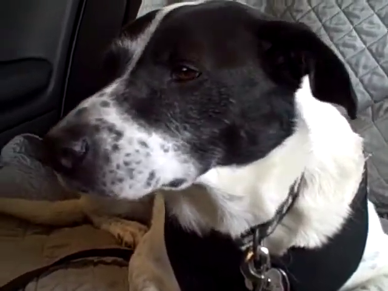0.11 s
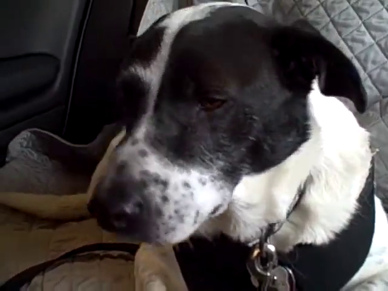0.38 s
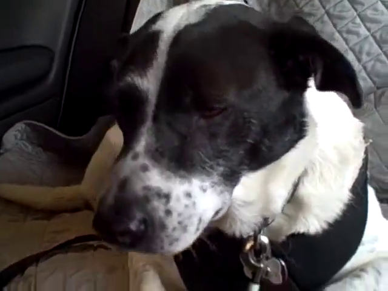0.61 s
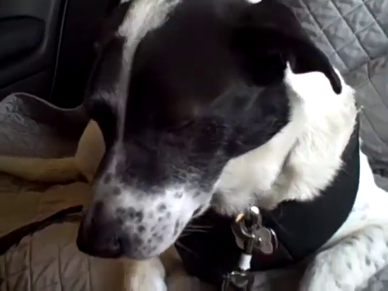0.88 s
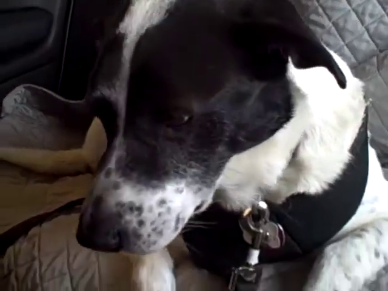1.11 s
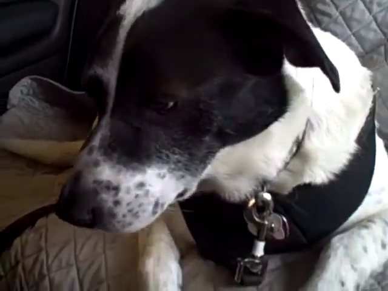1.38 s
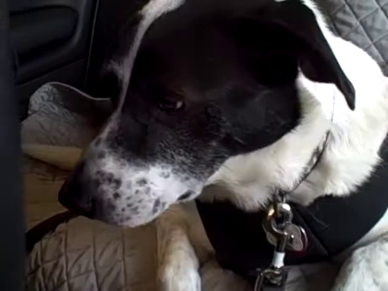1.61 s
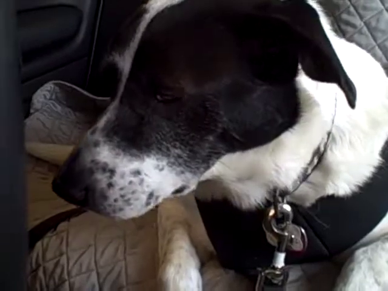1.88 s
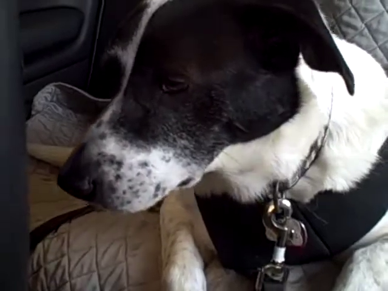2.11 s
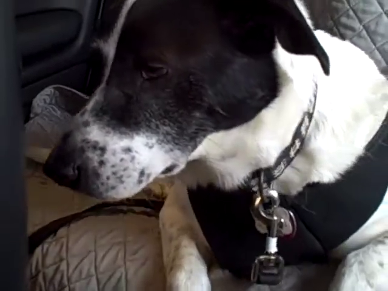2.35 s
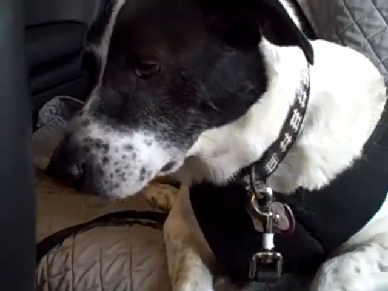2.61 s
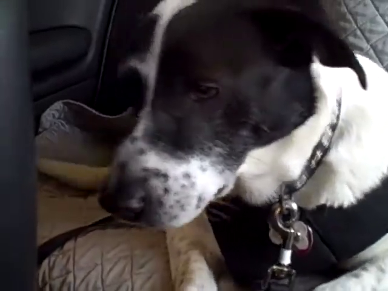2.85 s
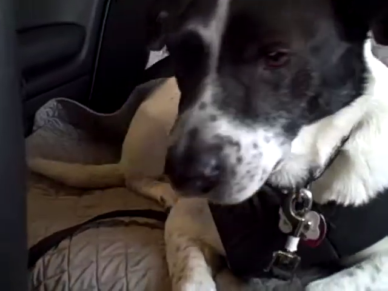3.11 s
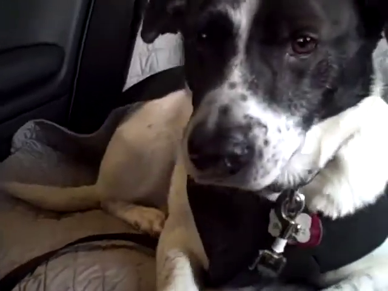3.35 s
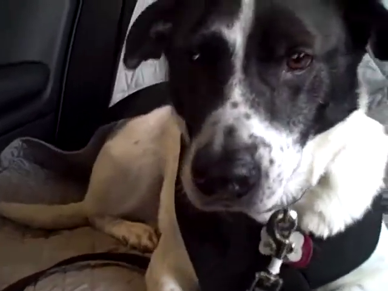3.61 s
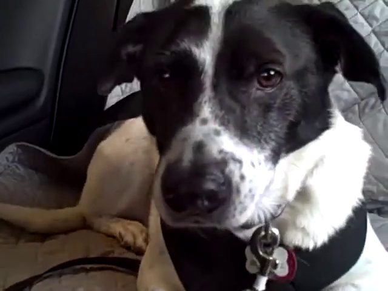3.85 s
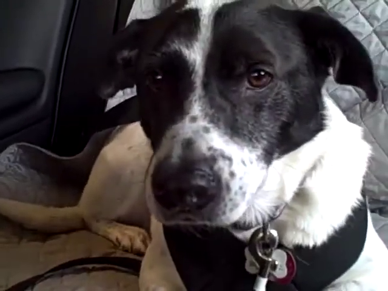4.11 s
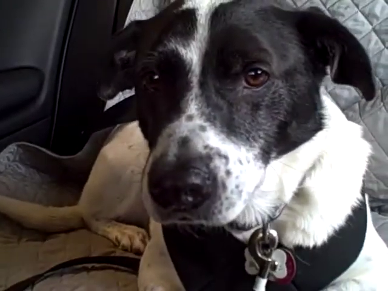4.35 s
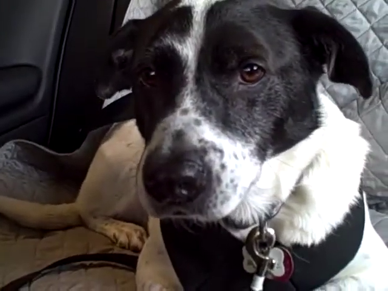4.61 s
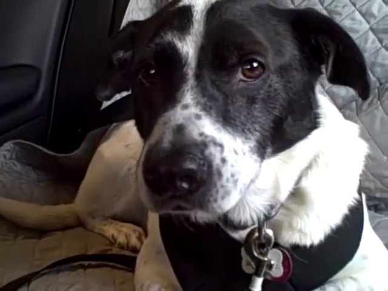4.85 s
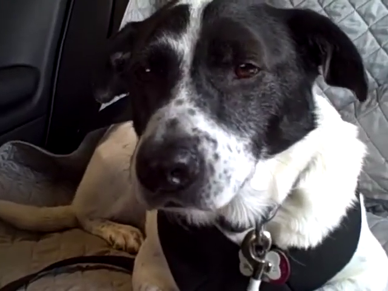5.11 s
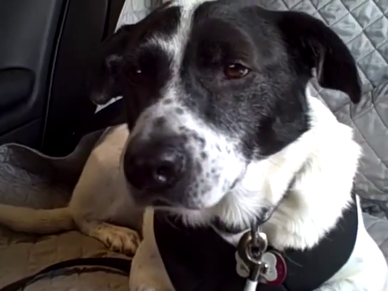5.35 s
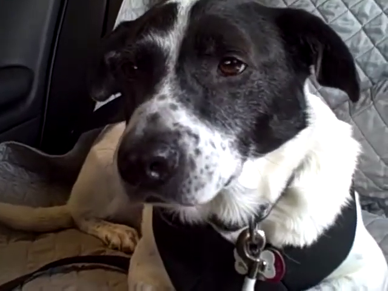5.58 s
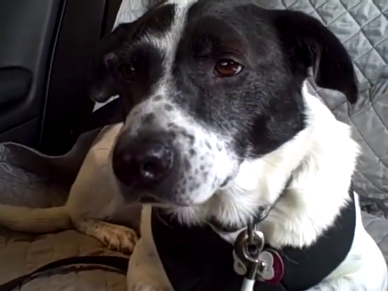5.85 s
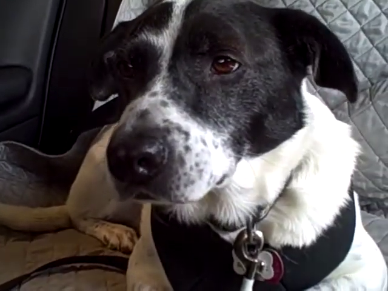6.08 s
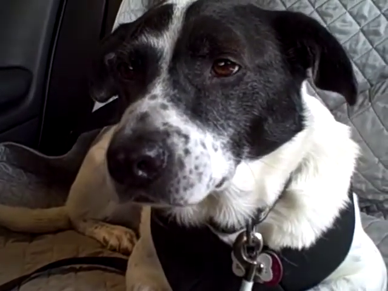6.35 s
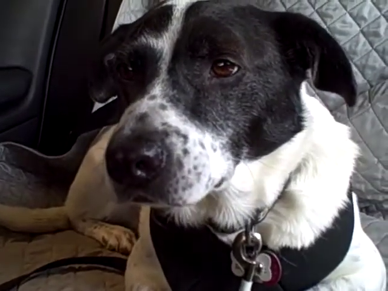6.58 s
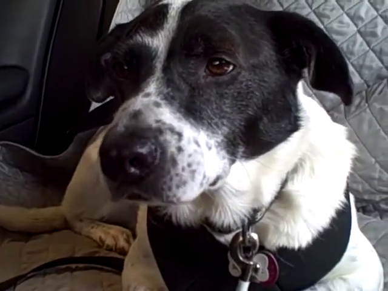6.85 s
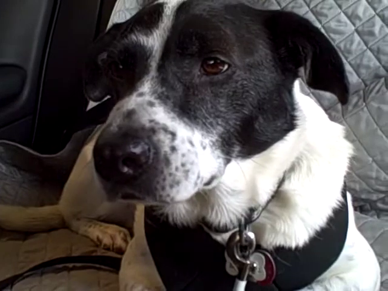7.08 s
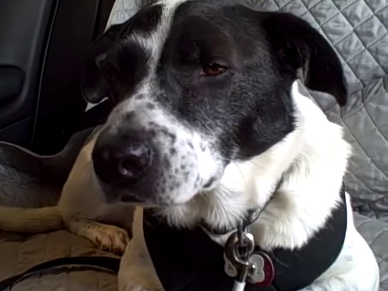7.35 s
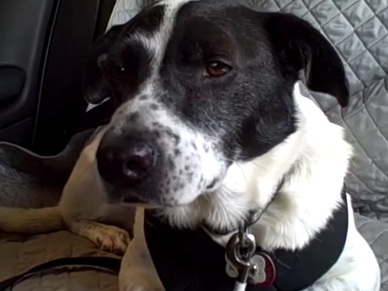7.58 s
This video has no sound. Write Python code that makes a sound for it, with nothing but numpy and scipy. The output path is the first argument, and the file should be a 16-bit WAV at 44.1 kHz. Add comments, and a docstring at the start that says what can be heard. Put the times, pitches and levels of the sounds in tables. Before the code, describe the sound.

Deep, unbroken ferry engine rumble fills a car cabin, pulsing gently underneath, with a wavering mid whine and a thin layer of hiss.

```python
"""A ferry's diesel engines drone steadily inside a car on the vehicle deck, the fourth order of the cycle leading.
The engines are a harmonic comb of wavering sines; two propellers, slightly apart in blade rate, beat below.
Hull and deck are shaped noise, the deck's with narrow resonances; a turbocharger whistles faintly as two sines.
A coarse 8-bit companding converter adds hiss that grows with the swings of the wave."""
import sys
import numpy as np
from scipy import signal
from scipy.fft import rfft, irfft, next_fast_len
from scipy.io import wavfile

SR = 44100
rng = np.random.default_rng(int(sys.argv[2]) if len(sys.argv) > 2 else 0)


def ratio_of_db(decibels):
    """Turn decibels (scalar or array-like) into linear amplitude factors; 0 dB maps to 1."""
    return 10 ** (np.asarray(decibels, float) / 20)


def store_pcm(level_fs):
    """Save levels as 16-bit WAV."""
    pcm = np.round(np.clip(level_fs, -1, 1) * 32767).astype(np.int16)
    wavfile.write(sys.argv[1], SR, np.atleast_2d(pcm).T)


N = 340011  # length in samples


def seconds():
    """Uniform sampling: the time of every sample, in s."""
    return np.arange(N) / SR


def in_time(rows):
    """Linear interpolation: a table of (t/s, value) read at every sample."""
    t, values = np.transpose(rows)
    return np.interp(seconds(), t, values)


def stretch(slow, size):
    """Linear interpolation: a coarse curve read at more points."""
    return np.interp(np.linspace(0, len(slow) - 1, size), np.arange(len(slow)), slow)


def drift(rate_hz, count):
    """Low-passed white noise wanders slowly: rows of unit spread, one point for every 200 samples."""
    settling = 500  # points discarded while the filter fills
    pole = np.exp(-2 * np.pi * rate_hz * 200 / SR)
    white = rng.standard_normal((count, N // 200 + 2 + settling))
    slow = signal.lfilter([1], [1, -2 * pole, pole ** 2], white)[:, settling:]
    return slow / slow.std(axis=1, keepdims=True)


def slow_curve(rate_hz):
    """Low-passed white noise again: a single drift at the full sample rate."""
    return stretch(drift(rate_hz, count=1)[0], N)


def tone(hz, db):
    """Phase is the integral of frequency: a sine following curves of pitch and rms level."""
    turns = np.cumsum(hz * np.ones(N)) / SR + rng.random()
    return np.sqrt(2) * ratio_of_db(db) * np.sin(2 * np.pi * turns)


def coloured_noise(spectrum):
    """Spectral shaping: white noise weighted to a density in dB per Hz, straight over log frequency."""
    size = next_fast_len(N)
    hz = np.maximum(np.fft.rfftfreq(size, 1 / SR), 1)
    table_hz, density_db = np.transpose(spectrum)
    gain = ratio_of_db(np.interp(np.log(hz), np.log(table_hz), density_db))
    white = rng.standard_normal(size)
    return irfft(rfft(white) * gain, size)[:N] * np.sqrt(SR / 2)


def engine():
    """Periodic forcing gives a line spectrum: each order wavers on its own path through the steel."""
    # orders that stand apart from the rule: order (multiple of the cycle), level/dB (rms)
    orders_apart = [(2, -39), (5, -32.5), (6, -34.5), (8, -58), (9, -42.5), (24, -53.5), (30, -52.5),
                    (32, -53.5), (41, -55), (46, -56.5), (48, -70), (51, -57.5), (52, -55), (56, -59),
                    (60, -57), (111, -61), (113, -63), (116, -62.5)]
    # smooth line beneath the other orders: order (multiple of the cycle), level/dB (rms)
    weak_orders = [(7, -60), (10, -49), (14, -57), (18, -67), (26, -65), (42, -59.5), (50, -66), (60, -70),
                   (75, -74), (105, -73.5), (118, -69), (135, -74.5), (190, -79.5), (225, -79.5),
                   (245, -86.5)]
    # level of the gear whine: t/s, level/dB (rms)
    gear_level = [(0, -53), (1.5, -51), (2.0, -60.5), (2.6, -57), (3.8, -62.5), (4.15, -50), (5.8, -51.5),
                  (6.4, -59), (7.2, -52.5), (7.7, -51)]
    top_order = 245
    firing_order, gear_order = 4, 124
    firing_db, firing_waver_db = -18, 0.5
    fourth_lift_db, third_lift_db, lift_fades_orders = 8.0, 7.0, 120.0
    waver_db, waver_hz, slip_turns, scatter_db = 2.0, 1.5, 0.06, 2.0

    # engine speed in cycles per s: the governor hunts gently about it
    cycle_hz, hunt_hz, hunt_period_s, hunt_top_s = 8.325, 0.006, 3.3, 1.5
    speed = cycle_hz + hunt_hz * np.cos(2 * np.pi * (seconds() - hunt_top_s) / hunt_period_s)

    # the leading orders are made apart, at the full rate; order 3 is absent
    orders = np.setdiff1d(np.arange(2, top_order), [3, firing_order, gear_order])
    # every third and fourth order is lifted, less so higher up
    thirds, fourths = orders % 3 == 0, orders % 4 == 0
    lift = np.maximum(third_lift_db * thirds, fourth_lift_db * fourths)
    lift = lift * np.exp(-orders / lift_fades_orders)
    levels = np.interp(orders, *np.transpose(weak_orders)) + lift
    levels = levels + scatter_db * rng.standard_normal(len(orders))
    for order, db in orders_apart:
        levels[orders == round(order)] = db

    # the orders lie low: an eighth of the sample rate holds them
    cycles = (np.cumsum(speed) / SR)[::8]
    size = len(cycles)
    wavers = drift(waver_hz, count=len(orders))
    slips = drift(waver_hz, count=len(orders))
    comb = np.zeros(size)
    for order, db, waver, slip in zip(orders, levels, wavers, slips):
        turns = order * cycles + rng.random() + slip_turns * stretch(slip, size)
        comb += ratio_of_db(db + waver_db * stretch(waver, size)) * np.sin(2 * np.pi * turns)
    comb = np.sqrt(2) * signal.resample_poly(comb, 8, 1, padtype="edge")[:N]

    firing = tone(firing_order * speed, firing_db + firing_waver_db * slow_curve(0.8))
    gear_whine = tone(gear_order * speed, in_time(gear_level))
    return comb + firing + gear_whine


def propellers():
    """Two close frequencies beat: the second screw's blade rate is higher by one turn a beat period."""
    blade_hz, wobble_hz = 22.96, 0.25
    first_db, second_db = -27, -34
    beat_period_s, beat_top_s = 1.42, 0.3  # loudest at beat_top_s and each period on
    turns = np.cumsum(blade_hz + wobble_hz * slow_curve(0.98)) / SR + rng.random()
    ahead = (seconds() - beat_top_s) / beat_period_s
    first = ratio_of_db(first_db) * np.sin(2 * np.pi * turns)
    second = ratio_of_db(second_db) * np.sin(2 * np.pi * (turns + ahead))
    return np.sqrt(2) * (first + second)


def hull():
    """Random vibration has a continuous spectrum: hull rumble in the car's cabin as steady noise."""
    # density of the rumble: f/Hz, level/dB (per Hz)
    rumble = [(5, -74), (12, -56), (19, -47), (23, -40), (29, -47), (38, -46), (47, -39), (53, -41.5),
              (60, -49), (75, -60), (110, -63), (165, -73), (300, -100.5)]
    return coloured_noise(rumble)


def deck():
    """Resonance narrows noise into humps: a broad roar with rung bands, swelling slightly."""
    # density of the roar before the overall level below: f/Hz, level/dB (per Hz)
    roar_density = [(100, -75), (170, -73), (240, -64.5), (295, -71), (350, -68), (500, -71.5), (700, -77),
                    (950, -72.5), (1200, -80.5), (1450, -80.5), (2500, -84.5), (3200, -88.5), (4500, -95),
                    (8000, -99)]
    # resonances before the overall level below: f/Hz, width/Hz, level/dB (rms)
    humps = [(240.4, 15, -52), (400.3, 8, -57.5), (492.8, 20, -55), (853.5, 30, -58), (919.4, 25, -60),
             (1353, 60, -62), (1446, 20, -62), (1762, 5, -63.5), (1955, 40, -64.5), (2794, 60, -61),
             (2860, 25, -67.5)]
    start_db, rise_db_per_s, patchy_db = -1.08, 0.0529, 0.5
    roar = coloured_noise(roar_density)
    for hz, width_hz, db in humps:
        pole = np.exp(-np.pi * width_hz / SR)
        resonator = [1, -2 * pole * np.cos(2 * np.pi * hz / SR), pole ** 2]
        hump = signal.lfilter([1, 0, -1], resonator, rng.standard_normal(N))
        roar += ratio_of_db(db) * hump / hump.std()
    level_db = start_db + rise_db_per_s * seconds() + patchy_db * slow_curve(2.0)
    return roar * ratio_of_db(level_db)


def turbocharger():
    """Octave partials share one phase rate: a thin whistle and its double creep up in pitch together."""
    # level of the whistle's octave about which it flutters: t/s, level/dB (rms)
    octave_level = [(0, -73.5), (1.2, -67), (2.2, -79), (3.5, -75.5), (4.5, -67.5), (5.6, -69),
                    (6.5, -82.5), (7.0, -67.5), (7.7, -71.5)]
    start_hz, creep_hz_per_s, wobble_hz = 3510.5, 1.9, 0.97
    whistle_db, flutter_db = -67, 2.0
    hz = start_hz + creep_hz_per_s * seconds() + wobble_hz * slow_curve(3.0)
    whistle = tone(hz, whistle_db + flutter_db * slow_curve(3.0))
    octave = tone(2 * hz, in_time(octave_level) + flutter_db * slow_curve(3.0))
    return whistle + octave


def scene():
    """Superposition: the pressures of all sources add at one microphone."""
    return (engine() + propellers() + hull() + deck() + turbocharger())[None]


def compand(x):
    """Mu-law quantization: sixteen steps an octave of size, so large swings are rounded more coarsely."""
    full_scale, top, bias = 1.43, 8159, 33  # wave amplitude at the top code; then code units
    size = np.minimum(np.abs(x) / full_scale * top, top - 1) + bias
    step = 2 ** np.floor(np.log2(size)) / 16
    rounded = (np.floor(size / step) + 0.5) * step - bias  # middle of each step
    return np.sign(x) * rounded * full_scale / top


def roll_off(x):
    """The treble ends steeply here."""
    return signal.sosfilt(signal.butter(12, 8840, fs=SR, output="sos"), x)


def record(dry):
    """Sampling theorem: taken at a low rate, companded, then raised through a soft-edged low-pass."""
    converter_hz, up, down = 16000, 441, 160  # up / down is SR / converter_hz
    edge_hz, kaiser_beta, reach = 7900, 9.6, 14.3  # reach in converter samples to each side
    low_rate = compand(signal.resample_poly(dry, down, up, axis=1, padtype="edge"))
    low_pass = signal.firwin(2 * int(reach * up) + 1, edge_hz, window=("kaiser", kaiser_beta),
                             fs=converter_hz * up)
    mix = signal.resample_poly(low_rate, up, down, axis=1, window=low_pass, padtype="edge")[:, :N]
    return roll_off(mix)


dry = scene()
out = record(dry)
store_pcm(out)
```